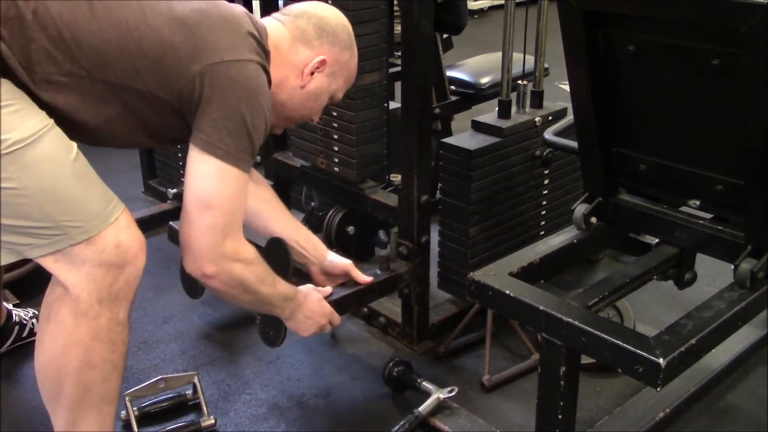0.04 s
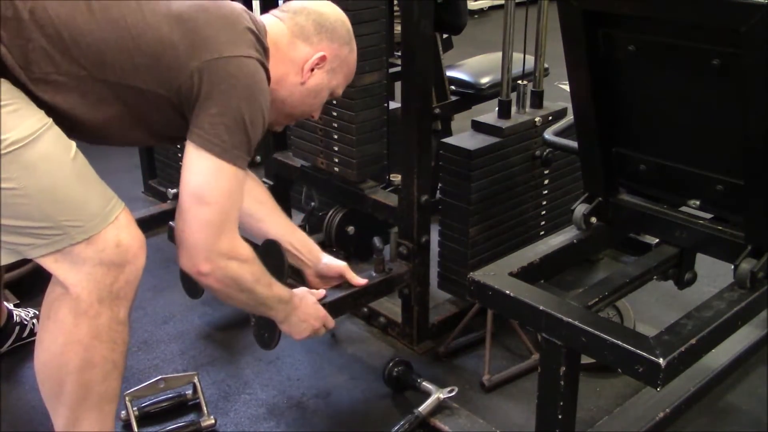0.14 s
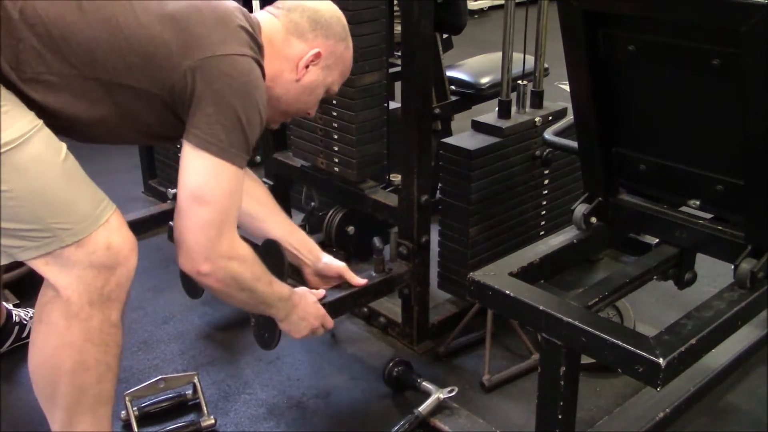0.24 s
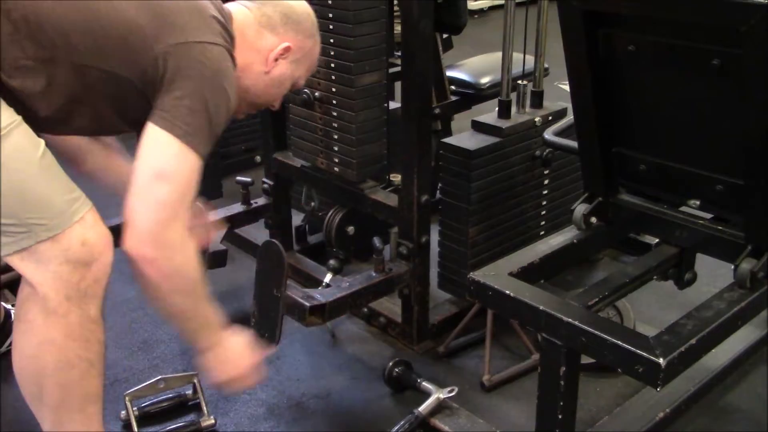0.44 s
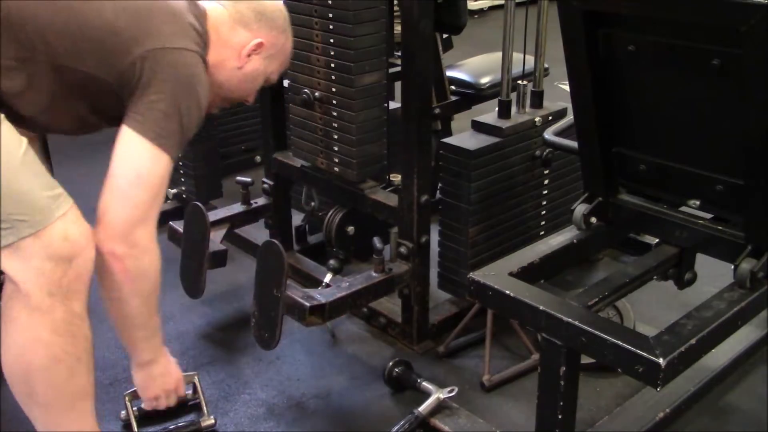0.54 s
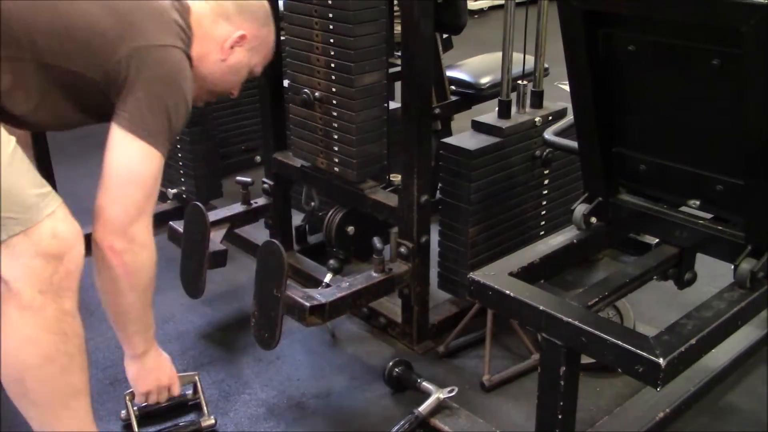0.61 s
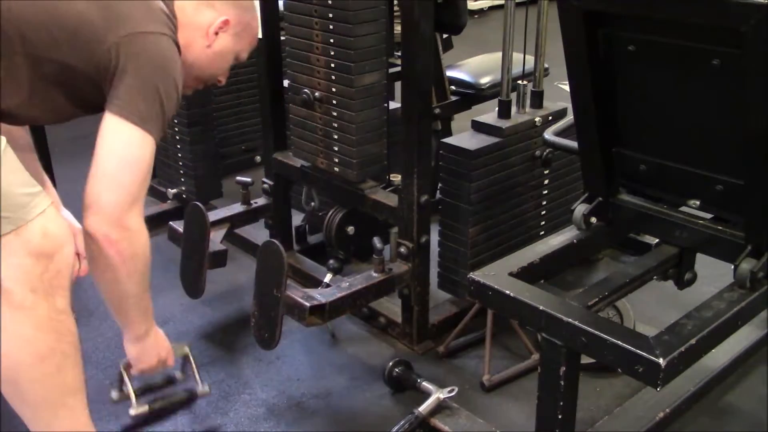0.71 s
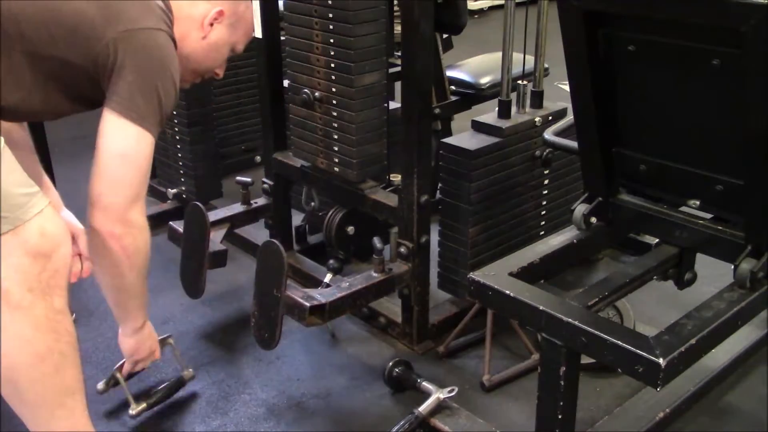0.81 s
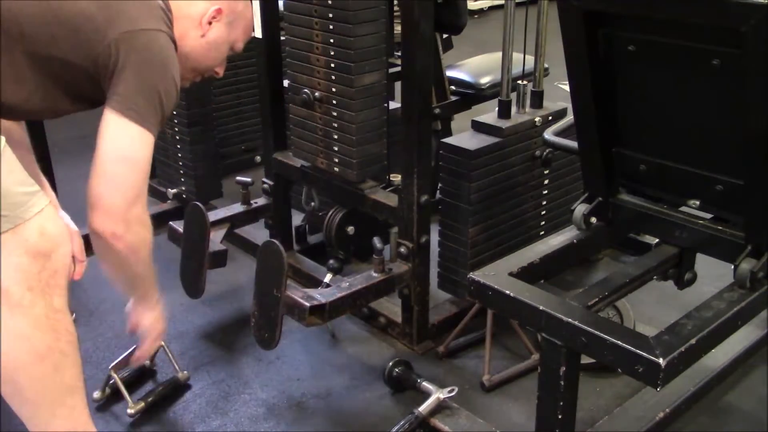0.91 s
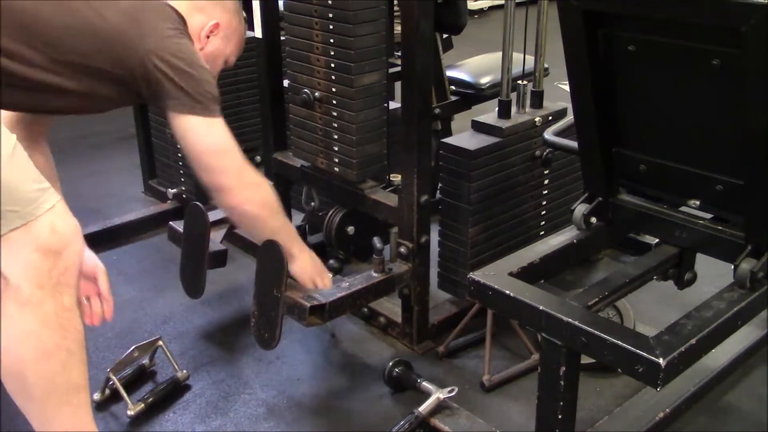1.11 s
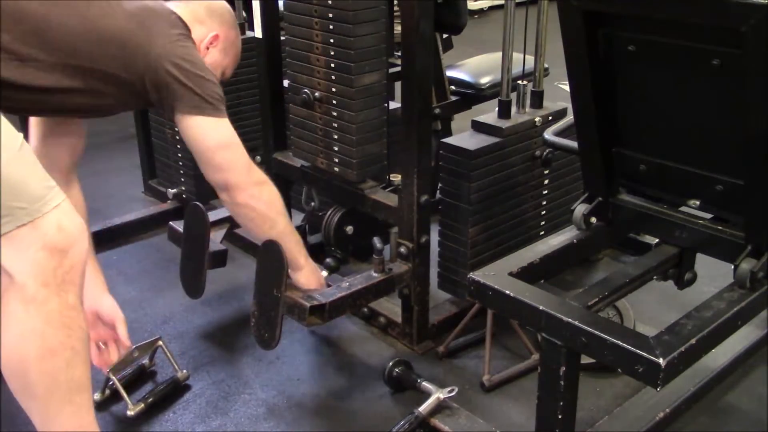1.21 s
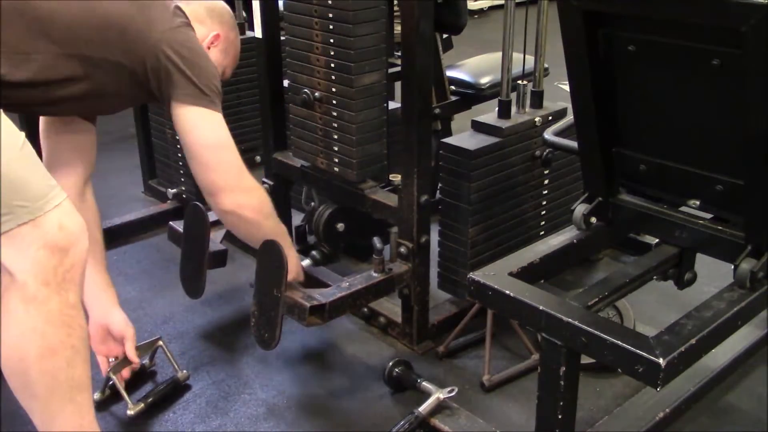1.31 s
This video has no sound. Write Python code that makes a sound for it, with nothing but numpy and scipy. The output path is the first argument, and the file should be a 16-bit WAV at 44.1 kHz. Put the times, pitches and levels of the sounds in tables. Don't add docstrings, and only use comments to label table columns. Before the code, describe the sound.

Heavy metal weight plates slam with a loud clank and rattle in a hard-walled gym

```python
import sys
import numpy as np
from scipy import signal
from scipy.fft import rfft, irfft
from scipy.io import wavfile
from scipy.ndimage import uniform_filter1d

SR = 44100
rng = np.random.default_rng(int(sys.argv[2]) if len(sys.argv) > 2 else 0)


def unload_audio(sound):
    columns = np.transpose(np.atleast_2d(sound))
    steps = np.round(np.clip(columns, -1, 1) * 32767)
    wavfile.write(sys.argv[1], SR, steps.astype(np.int16))


def invert_db(x):
    u = np.asarray(x, float) / 20
    return 10 ** u


N = 59535


def evened(x):
    return x / np.sqrt(np.mean(x ** 2) + 1e-20)


def read(points, hz):
    f, value = np.transpose(points)
    return np.interp(np.log(hz + 1), np.log(f + 1), value)


def coloured(x, colour):
    n = x.shape[-1]
    return irfft(rfft(x) * invert_db(read(colour, np.fft.rfftfreq(n, 1 / SR))), n)


def clicks(hits):
    out = np.zeros(N)
    for s, db in hits:
        out[round(s * SR)] += invert_db(db)
    return out


def ring(modes):
    t = np.arange(N) / SR
    out = np.zeros(N)
    for hz, db, t60 in modes:
        out += invert_db(db - 60 * t / max(t60, .005)) * np.sin(2 * np.pi * hz * t)
    return np.minimum(t / 0.0003, 1) * out


def strike(hits, colour, crack_t60, modes, ring_db, puff_db=0):
    length = 4096
    out, t = np.zeros(N + length), np.arange(length) / SR
    shape = np.minimum(t / 0.00018, 1) * invert_db(-60 * t / crack_t60)
    for s, db in hits:
        noise = coloured(rng.standard_normal(length), colour)
        burst = evened(shape * noise) * np.sqrt(np.mean(shape ** 2))
        out[round(s * SR):][:length] += burst * invert_db(db + puff_db)
    return out[:N] + invert_db(ring_db) * signal.fftconvolve(clicks(hits), ring(modes))[:N]


def pings(rows, rise_s):
    out, t = np.zeros(2 * N), np.arange(N // 2) / SR
    rise = np.minimum(t / rise_s, 1)
    for s, hz, db, t60 in rows:
        tone = rise * invert_db(db - 60 * t / max(t60, .004)) * np.sin(2 * np.pi * hz * t)
        out[round(s * SR):][:len(t)] += tone
    return out[:N]


# [f/Hz, level/dB]
AIR_COLOUR = [(18, -72), (30, -48.5), (134, -7.5), (381, -5), (412, -5.5), (772, -8.5), (952, -12),
              (2260, -18.5), (15700, -31)]
# [f/Hz, side minus mid level/dB]
AIR_WIDTH = [(60, -11.5), (240, -22), (950, -8), (3770, -4.5), (15000, -12.5)]


def air():
    mid, side = coloured(rng.standard_normal((2, N)), AIR_COLOUR)
    swell = invert_db(.6 * evened(uniform_filter1d(rng.standard_normal(N), 2000)))
    return invert_db(-57) * swell * np.array([mid, coloured(side, AIR_WIDTH)]) / np.std(mid)


# [t/s, level/dB]
EARLIER = [
    (.0, -47),
]
# [f/Hz, level/dB]
EARLIER_COLOUR = [(300, -11), (670, 4), (2900, -18), (5510, -10), (14000, -31)]


def earlier_knock():
    return strike(EARLIER, EARLIER_COLOUR, crack_t60=1.0, modes=RODS, ring_db=-7)


# [t/s, level/dB]
LATCH = [
    (.0145, -48.5),
    (.0200, -24.5),
    (.0232, -28.5),
    (.0555, -42),
    (.105, -60),
]
# [f/Hz, level/dB]
LATCH_COLOUR = [(120, -60.5), (200, -34), (1740, -5), (3430, -7), (4040, -10.5), (13100, -13),
                (16000, -29.5)]
# [f/Hz, level/dB, t60/s]
LATCH_MODES = [(1846, -8, .07), (2266, -5, .05), (2466, -9, .04), (3435, 0, .02), (8200, -14, .008),
               (13200, -17, .006)]
# [t/s, level/dB]
NUDGE = [
    (.062, -38.5),
    (.078, -43),
    (.093, -42.5),
    (.118, -46),
]
# [t/s, f/Hz, level/dB, t60/s]
CREAK = [(.013, 1930, -41, 0.026), (.046, 2284, -34.5, 0.048), (.052, 1920, -36.5, 0.064),
         (.064, 2350, -36, 0.026), (.067, 3964, -37, 0.077), (.071, 3330, -28.5, 0.014),
         (.078, 3900, -39.5, 0.067), (.088, 4270, -46, .03), (.105, 1820, -44, 0.049),
         (.131, 1840, -37.5, 0.023), (.043, 606, -36, 0.055), (.077, 635, -43.5, 0.027),
         (.092, 616, -38.5, 0.026)]


def latch():
    knock = strike(LATCH, LATCH_COLOUR, crack_t60=0.031, modes=LATCH_MODES, ring_db=0.29)
    nudge = strike(NUDGE, THUD_COLOUR, crack_t60=0.17, modes=FRAME, ring_db=-20.5)
    return knock + nudge + pings(CREAK, rise_s=0.0012)


# [t/s, level/dB]
SPRING = [
    (.0672, -34.5),
    (.0705, -42.5),
]
# [f/Hz, level/dB]
SPRING_COLOUR = [(1500, -28.5), (3600, 7.5), (4300, -13.5), (5500, -13.5), (6700, -3.5), (10000, -33)]
# [f/Hz, level/dB, t60/s]
SPRING_MODES = [(3770, -4, 0.015), (6700, -6.5, 0.015)]
# [t/s, level/dB]
TICK = [
    (.1652, -32.5),
]
# [f/Hz, level/dB]
TICK_COLOUR = [(1470, -36), (2500, -12), (5910, -21), (6540, -13.5), (10900, -0.5), (16200, -20.5)]
# [t/s, level/dB]
PIN = [
    (.1718, -36.5),
    (.178, -42),
    (.1815, -44.5),
    (.188, -38.5),
    (.1935, -39.5),
    (.2005, -28.5),
    (.2022, -33),
]
# [f/Hz, level/dB]
PIN_COLOUR = [(1000, -10), (2700, -9.5), (3450, -6.5), (4500, -12.5), (5200, -16.5), (7000, -14),
              (16000, -26.5)]
# [f/Hz, level/dB, t60/s]
PIN_MODES = [(3350, -6.5, 0.017), (4430, -8.5, 0.012), (6650, -8, 0.017)]
# [t/s, f/Hz, level/dB, t60/s]
SCRAPE = [(.1655, 3500, -37.5, 0.01), (.1655, 6600, -42.5, .03), (.1722, 3420, -29.5, 0.031),
          (.173, 6700, -37.5, 0.018), (.1765, 3650, -36, .015), (.1785, 4150, -35, .02),
          (.181, 4400, -40, .012), (.187, 4350, -32.5, .012), (.189, 2950, -39.5, .025),
          (.192, 4600, -32.5, .02), (.1985, 2850, -24.5, .02)]


def pin():
    spring = strike(SPRING, SPRING_COLOUR, crack_t60=0.017, modes=SPRING_MODES, ring_db=1.8)
    tick = strike(TICK, TICK_COLOUR, crack_t60=0.0052, modes=PIN_MODES, ring_db=-2)
    knocks = strike(PIN, PIN_COLOUR, crack_t60=0.11, modes=PIN_MODES, ring_db=0.5)
    return spring + tick + knocks + pings(SCRAPE, rise_s=.0012)


# [f/Hz, spread/Hz, level/dB, t60/s]
SWARMS = [(5770, 430, 5, 0.39), (6610, 37, -3.5, 0.5), (7590, 110, 4, 0.25), (8740, 160, 1.5, 0.35),
          (5890, 350, -17.5, 1.38), (7800, 1700, -12.5, 1.05), (2750, 1100, -23.5, 1.87)]


def swarm():
    t, hz = np.arange(N) / SR, np.fft.rfftfreq(N, 1 / SR)
    out = np.zeros(N)
    for mid_hz, spread, db, t60 in SWARMS:
        band = np.exp(-.5 * ((hz - mid_hz) / spread) ** 2)
        noise = irfft(rfft(rng.standard_normal(N)) * band, N)
        out += invert_db(db - 60 * t / t60) * evened(noise)
    return out


# [f/Hz, level/dB]
RATTLE_COLOUR = [(900, -32), (1500, -5), (2770, -8), (4460, -10.5), (5200, -12.5), (5950, -1.5),
                 (8160, -7.5), (15300, -12), (16000, -39.5)]
# [f/Hz, level/dB, t60/s]
PLATES = [(3570, -4.5, 0.18), (5959, -20, 0.27), (7560, 0, 0.17), (9100, -10.5, 0.24), (11800, -7, 0.1506),
          (15400, -19.5, 0.3)]
# [f/Hz, level/dB, t60/s]
RODS = [(3670, -0.5, 0.66), (3656, -20.5, 2.4), (3500, -10.5, 0.64), (2290, -20, 0.99)]


def rattle():
    start_s, length_s, ticks_per_s, fade_t60 = 0.2013, 0.051, 1500, 0.28
    t = np.arange(N) / SR - start_s
    shape = np.clip(t / 0.013, 0, 1) * invert_db(-60 * np.maximum(t - length_s, 0) / fade_t60)
    force = invert_db(0.61 * np.minimum(rng.exponential(1, N), 4))
    sign = rng.choice([-1., 1.], N)
    ticks = evened(force * sign * (rng.random(N) < ticks_per_s / SR))
    grit = 0.34 * ticks + rng.standard_normal(N)
    hiss = invert_db(-16.5) * evened(coloured(grit, RATTLE_COLOUR)) * shape
    drive = ticks * shape / np.sqrt(SR * length_s) + 1.6 * clicks([(SLAM[0][0], 0)])
    steel = invert_db(-31.5) * ring(PLATES) + invert_db(-30.5) * swarm() + invert_db(-39) * ring(RODS)
    return hiss + signal.fftconvolve(drive, steel)[:N]


# [t/s, level/dB]
SLAM = [
    (.2046, -3),
    (.2055, -10),
    (.2064, -4),
    (.2072, -6.5),
]
# [f/Hz, level/dB]
SLAM_COLOUR = [(120, -66.5), (200, -42.5), (1420, -2), (2210, -12.5), (3370, 4), (5000, -0.5), (6050, 0.5),
               (15100, -4), (16000, -23.5)]
# [f/Hz, level/dB, t60/s]
SLAP = [(4530, -13, 0.0036), (7100, -5, 0.011), (10650, 7.5, 0.0097), (15000, 3.5, 0.0089)]
# [t/s, level/dB]
BOUNCES = [(.2158, -18), (.2215, -16), (.225, -15), (.2285, -16), (.235, -17), (.2385, -16), (.2435, -16),
           (.2495, -15), (.258, -18)]
# [f/Hz, level/dB, t60/s]
BOUNCE_MODES = [(5800, 1.5, .02), (6000, -8.5, 0.06), (7100, -6, .015)]


def stack():
    slam = strike(SLAM, SLAM_COLOUR, crack_t60=0.012, modes=SLAP, ring_db=-13.5, puff_db=-2.5)
    claps = strike(BOUNCES, RATTLE_COLOUR, crack_t60=0.016, modes=BOUNCE_MODES, ring_db=-4.5, puff_db=-1.5)
    return slam + rattle() + claps


# [t/s, f/Hz, level/dB, t60/s]
BOOMS = [(.205, 1490, -20.5, 0.11), (.208, 595, -22, 0.024), (.212, 951, -23.5, .1),
         (.216, 1268, -22, 0.22), (.222, 491, -21, .1), (.221, 1790, -20, 0.057), (.233, 445, -18, .09),
         (.236, 1480, -22, 0.096), (.238, 290, -22.5, 0.045), (.257, 1292, -19, 0.15),
         (.294, 394, -32.5, 0.08), (.308, 527, -32.5, 0.25), (.33, 772, -33, 0.073)]


def frame_booms():
    return pings(BOOMS, rise_s=0.0077)


# [t/s, level/dB]
THUD = [
    (.206, -31.5),
    (.222, -27.5),
    (.2345, -21.5),
    (.242, -22.5),
]
# [f/Hz, level/dB]
THUD_COLOUR = [(35, -81), (60, -38.5), (329, -4.5), (432, 1.5), (780, 0), (1030, -4.5), (1280, 1.5),
               (1600, -11.5), (3500, -33), (4550, -39.5), (7700, -120)]
# [f/Hz, level/dB, t60/s]
FRAME = [(330, -12, 0.04), (481.7, -8, 0.2), (560, -10, .25), (640, -7, .2), (786, -3, .3), (944, -6, 0.2),
         (1281, -7, 0.25), (1560, -6.5, 0.09)]


def thud():
    return strike(THUD, THUD_COLOUR, crack_t60=0.097, modes=FRAME, ring_db=-20)


# [t/s, level/dB]
TAP = [
    (.9345, -33),
    (.9372, -33),
]
# [f/Hz, level/dB]
TAP_COLOUR = [(150, -6), (700, 0), (2500, -3), (3200, -25), (9000, -45)]
# [f/Hz, level/dB, t60/s]
TAP_MODES = [(560, 0, .014), (1000, -6, .006), (2300, -10, .006)]
# [t/s, level/dB]
JINGLE = [
    (.9365, -66),
    (.983, -67.5),
    (.994, -64),
]
# [f/Hz, level/dB, t60/s]
JINGLE_MODES = [(14200, 4, 0.07), (6640, 2, 0.06)]
# [t/s, level/dB]
HANDLE = [
    (.9590, -24),
    (.9608, -30),
    (.9915, -40),
]
# [f/Hz, level/dB]
HANDLE_COLOUR = [(150, -4.5), (1870, -1), (3840, -24), (5680, -14), (13200, -36), (16000, -32)]
# [f/Hz, level/dB, t60/s]
HANDLE_MODES = [(334.7, -8, 0.032), (1356, -6, 0.0097), (1833, 0.5, 0.008), (5860, -21, .006),
                (2212, -33, 0.89)]
# [t/s, level/dB]
WOBBLE = [
    (.9625, -40),
    (.972, -39.5),
    (.981, -47),
    (.995, -46),
]
# [f/Hz, level/dB]
WOBBLE_COLOUR = [(150, 1.5), (400, 7.5), (666, -7), (1500, 0.5), (2700, -3.5), (3950, -26), (9000, -41)]


def handle():
    tap = strike(TAP, TAP_COLOUR, crack_t60=0.011, modes=TAP_MODES, ring_db=0, puff_db=-7.5)
    jingle = strike(JINGLE, HOOK_COLOUR, crack_t60=.01, modes=JINGLE_MODES, ring_db=1.4)
    landing = strike(HANDLE, HANDLE_COLOUR, crack_t60=0.0084, modes=HANDLE_MODES, ring_db=1.26, puff_db=-7)
    wobble = strike(WOBBLE, WOBBLE_COLOUR, crack_t60=0.085, modes=JINGLE_MODES, ring_db=-34)
    return tap + jingle + landing + wobble


# [t/s, level/dB]
HOOK = [
    (1.2572, -58.5),
    (1.2758, -49),
    (1.2772, -40),
    (1.2828, -54),
    (1.2888, -42),
    (1.2905, -48),
    (1.312, -49),
    (1.3215, -55),
]
# [f/Hz, level/dB]
HOOK_COLOUR = [(1470, -41.5), (2500, -8), (5100, -14), (6990, 2.5), (8770, -22), (14500, -1), (16300, -17)]
# [f/Hz, level/dB, t60/s]
HOOK_MODES = [(3430, -9, 0.012), (6647, -9, 0.015), (7160, -7, 0.012)]
# [t/s, f/Hz, level/dB, t60/s]
GATE = [(1.2565, 7060, -54, 0.017), (1.277, 1800, -48, 0.013), (1.2755, 3380, -48, .022),
        (1.282, 3220, -55, 0.019), (1.283, 7100, -56, .015), (1.295, 6510, -47, 0.019),
        (1.3125, 6520, -47.5, 0.022), (1.3205, 6790, -50.5, .02), (1.324, 3660, -50, 0.017)]


def hook():
    snap = strike(HOOK, HOOK_COLOUR, crack_t60=0.018, modes=HOOK_MODES, ring_db=-1.5)
    return snap + pings(GATE, rise_s=.001)


# [f/Hz, t60/s]
ROOM = [(150, 0.44), (400, 0.91), (1000, 0.74), (2500, 0.48), (6000, 0.49), (11000, 0.53), (16000, 0.34)]


def room(x):
    gap_s, rise_s = 0.0076, 0.0053
    taps = np.zeros((2, SR))
    at = np.arange(0, SR - 10, 10) + rng.integers(0, 10, (2, (SR - 1) // 10))
    np.put_along_axis(taps, at, rng.choice([-1., 1.], at.shape), 1)
    hz, t, z = signal.stft(taps, SR, nperseg=256)
    fade = invert_db(-60 * t / read(ROOM, hz)[:, None])
    tail = signal.istft(z * fade, SR, nperseg=256)[1]
    tail = tail * np.clip((np.arange(tail.shape[1]) / SR - gap_s) / rise_s, 0, 1)
    return signal.fftconvolve(x[None], tail / np.linalg.norm(tail[0]), axes=1)[:, :N]


# [f/Hz, side minus mid level/dB]
WIDTH = [(60, -39.5), (150, -36), (380, -52), (950, -48.5), (2380, -36), (5980, -14), (15000, -16.5)]


def scene():
    wash, former = air(), earlier_knock()
    latch_sound, pin_sound = latch(), pin()
    plates, booms, blow = stack(), frame_booms(), thud()
    handle_sound, hook_sound = handle(), hook()
    direct = former + latch_sound + pin_sound + plates + booms + blow + handle_sound + hook_sound
    to_room = invert_db(-8) * latch_sound + invert_db(-17) * pin_sound
    to_room += invert_db(-9) * plates + invert_db(-14) * booms + invert_db(-3) * blow
    to_room += invert_db(-10) * handle_sound + invert_db(-13) * hook_sound
    wet_mid, wet_side = room(to_room)
    side = coloured(wet_side + 0.66 * np.roll(direct, 40), WIDTH)
    bass_cut = signal.butter(4, 230, "high", fs=SR, output="sos")
    mid, side = wash + signal.sosfilt(bass_cut, [direct + wet_mid, side])
    return np.array([mid + side, mid - side])


def band_limit(x):
    return signal.sosfilt(signal.butter(12, 16830, fs=SR, output="sos"), x)


def record(dry):
    soft = 1.153 * np.tanh(dry / 1.15)
    low_pass = signal.firwin(255, 16300, fs=SR)
    limited = signal.oaconvolve(soft, low_pass[None], "same")
    return band_limit(limited)


dry = scene()
out = record(dry)
unload_audio(out)
```